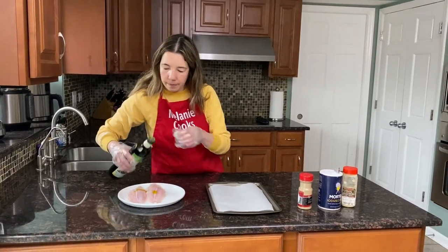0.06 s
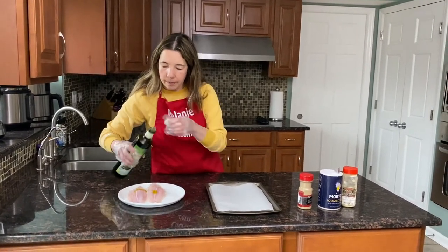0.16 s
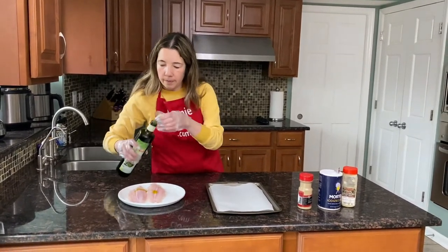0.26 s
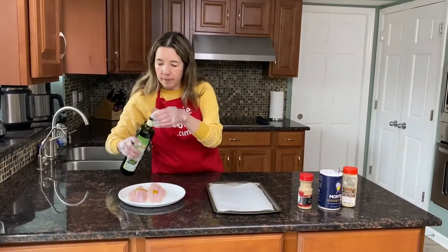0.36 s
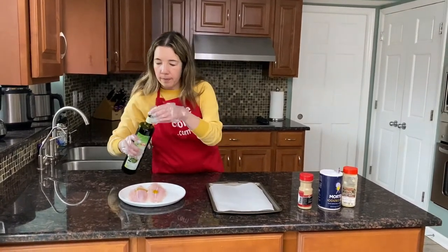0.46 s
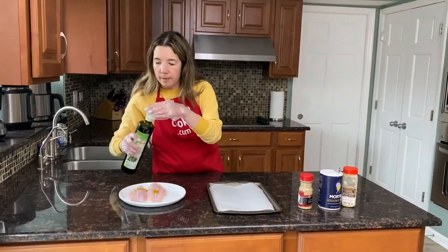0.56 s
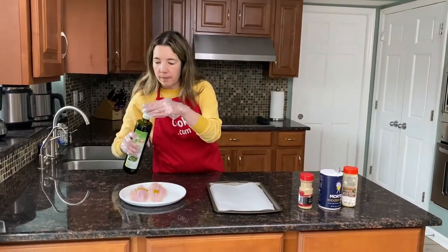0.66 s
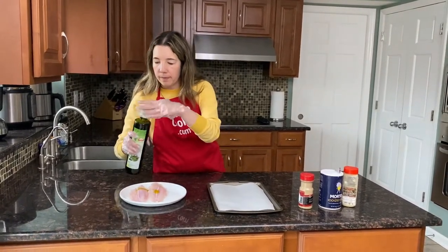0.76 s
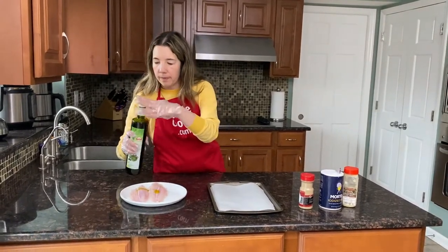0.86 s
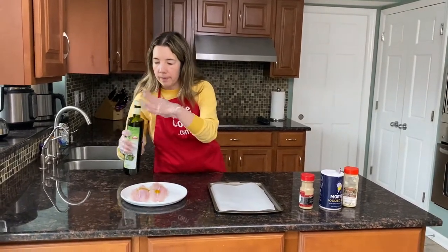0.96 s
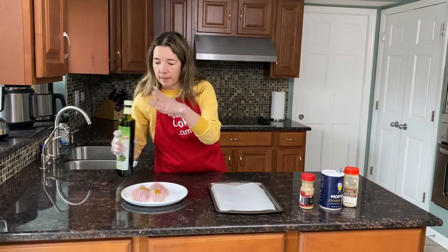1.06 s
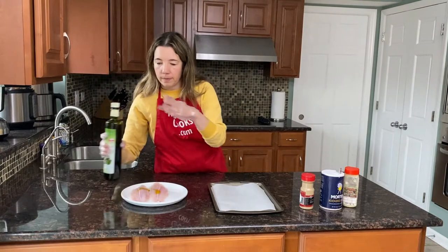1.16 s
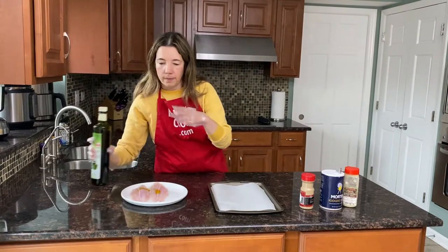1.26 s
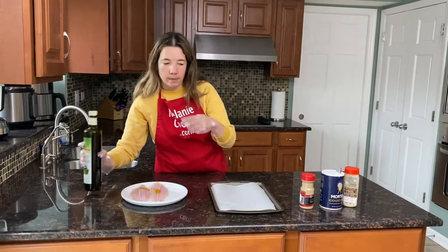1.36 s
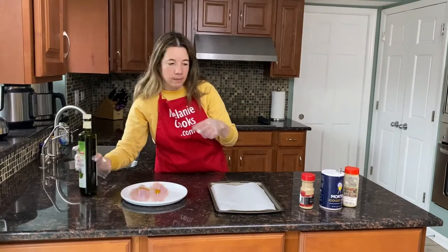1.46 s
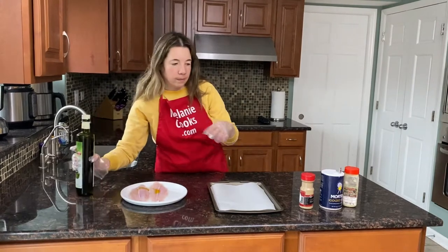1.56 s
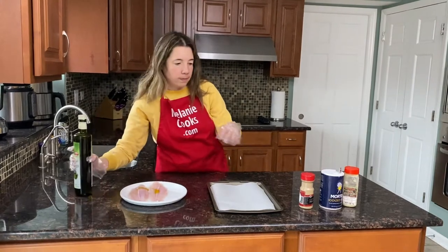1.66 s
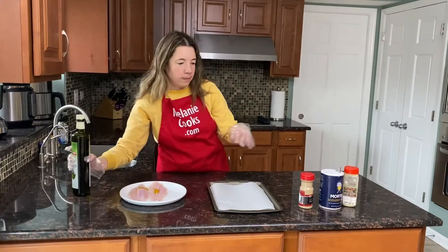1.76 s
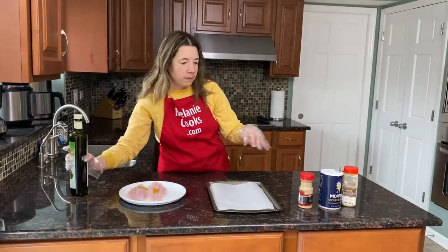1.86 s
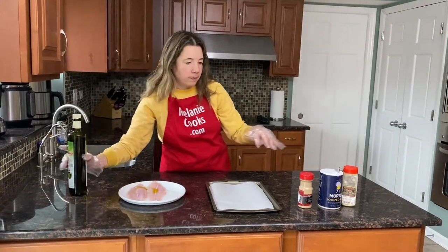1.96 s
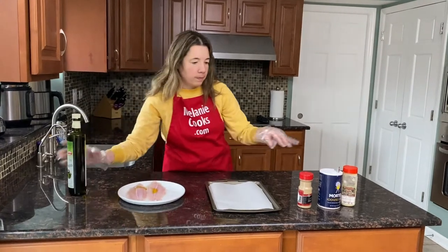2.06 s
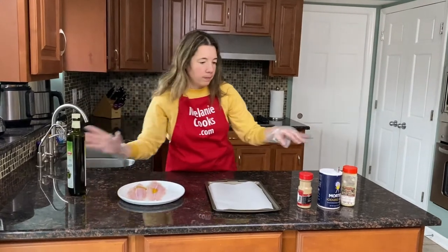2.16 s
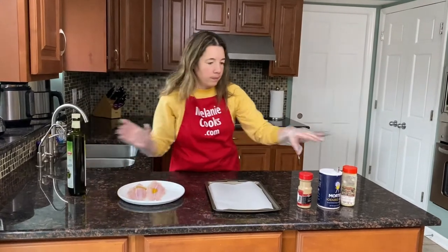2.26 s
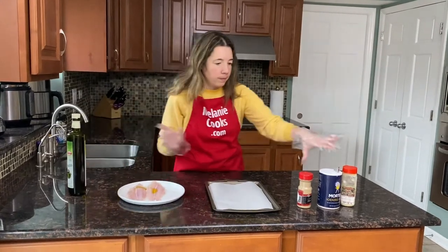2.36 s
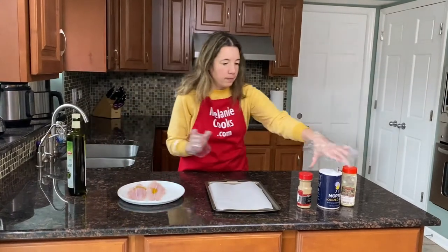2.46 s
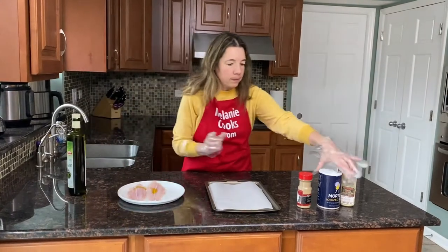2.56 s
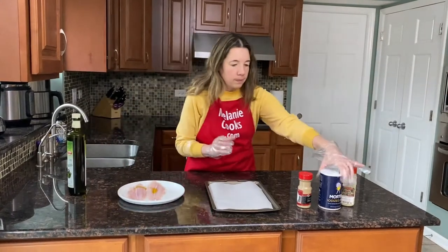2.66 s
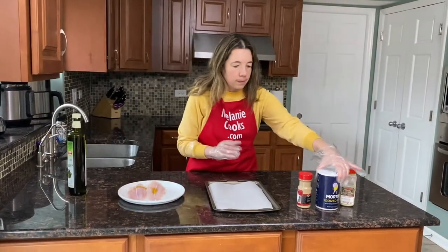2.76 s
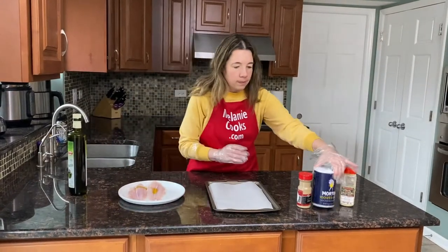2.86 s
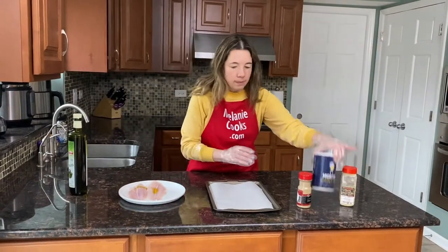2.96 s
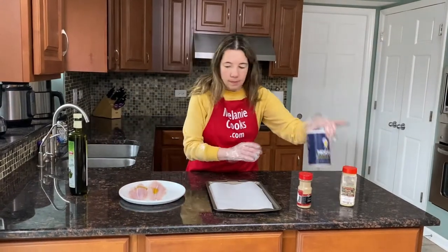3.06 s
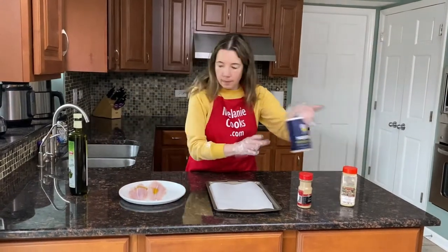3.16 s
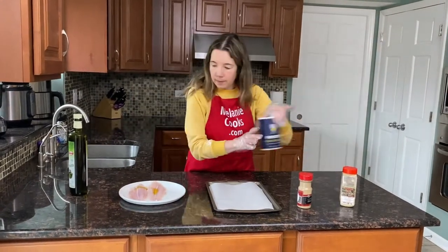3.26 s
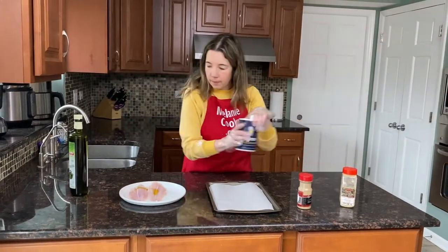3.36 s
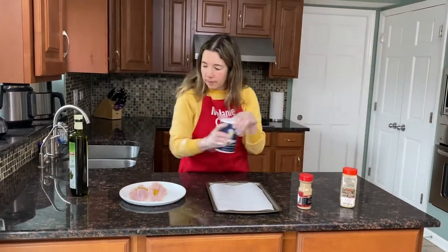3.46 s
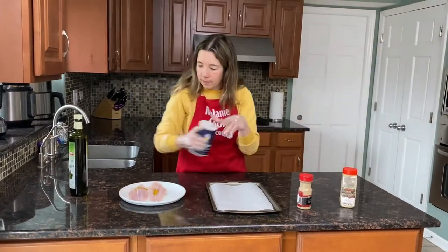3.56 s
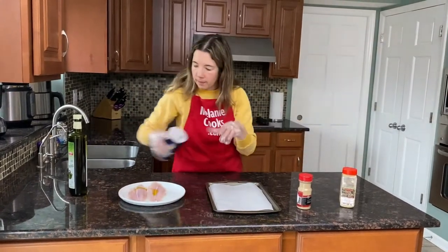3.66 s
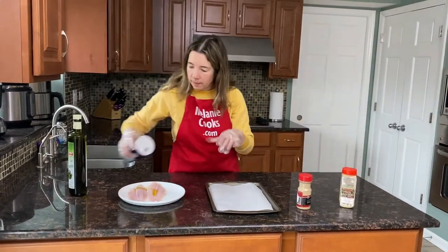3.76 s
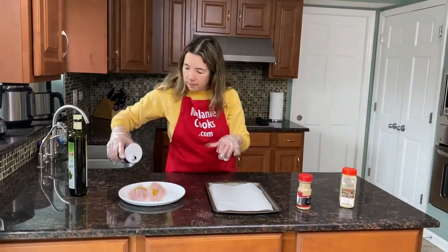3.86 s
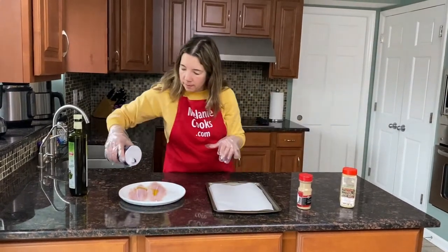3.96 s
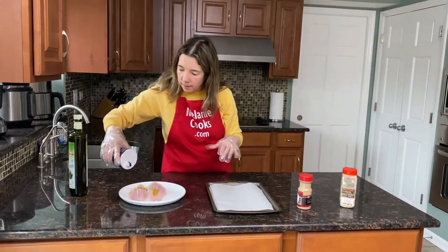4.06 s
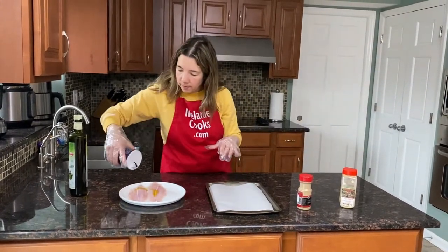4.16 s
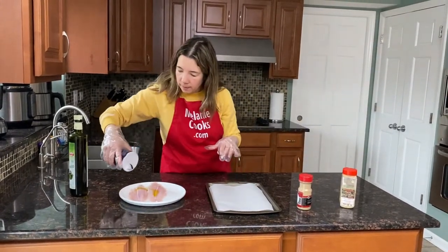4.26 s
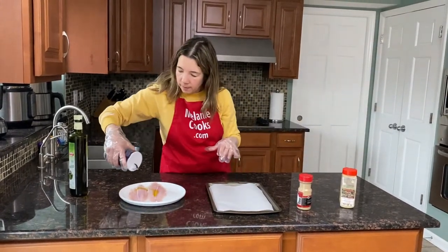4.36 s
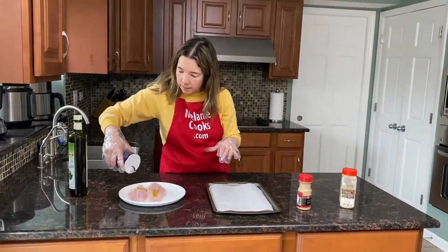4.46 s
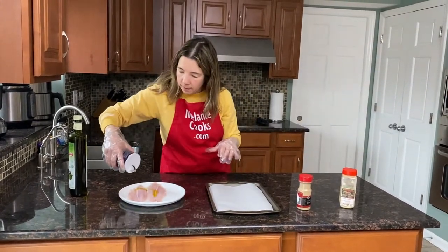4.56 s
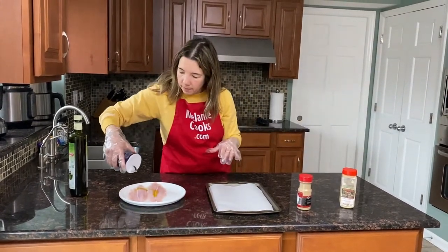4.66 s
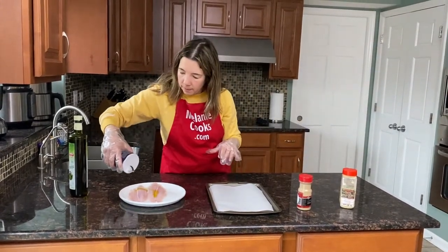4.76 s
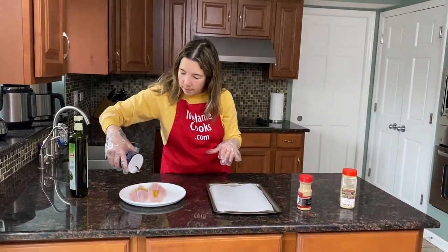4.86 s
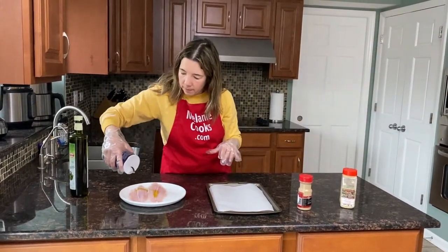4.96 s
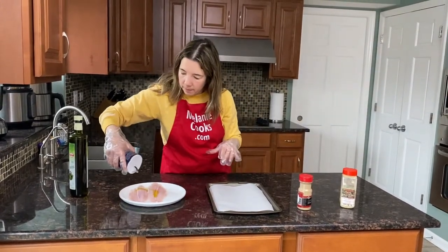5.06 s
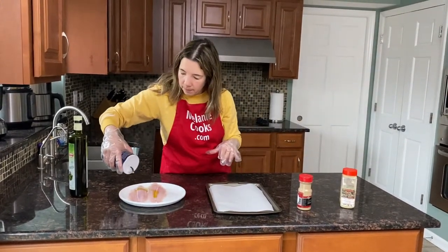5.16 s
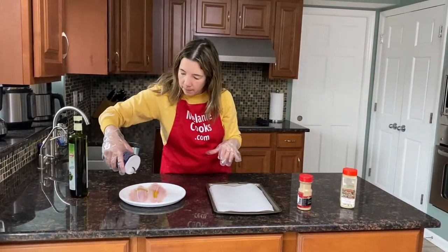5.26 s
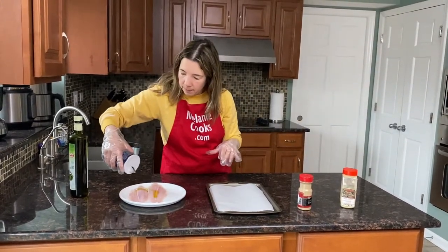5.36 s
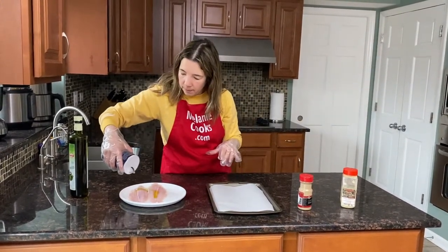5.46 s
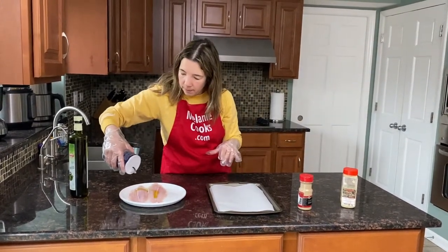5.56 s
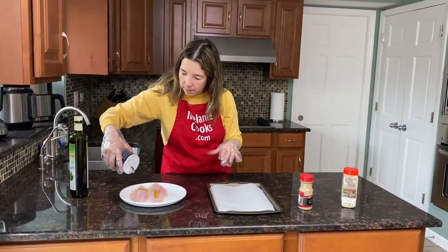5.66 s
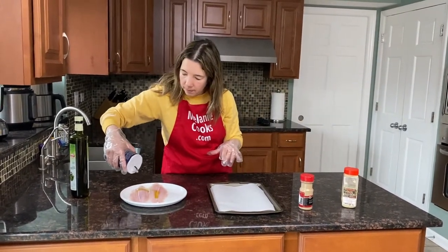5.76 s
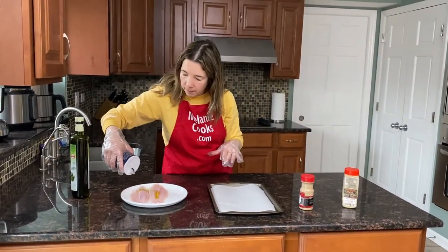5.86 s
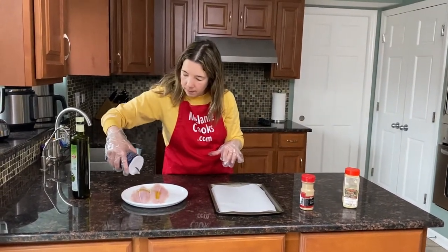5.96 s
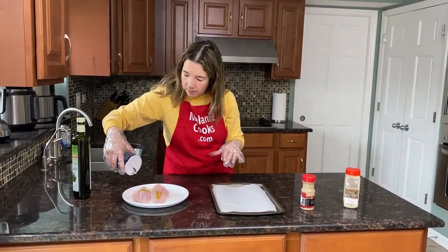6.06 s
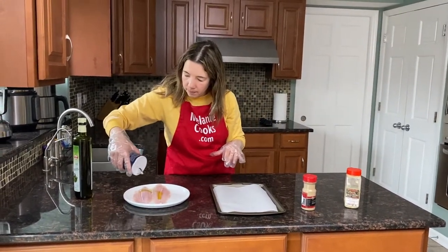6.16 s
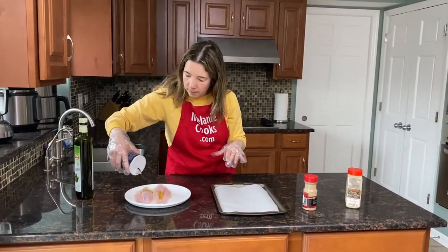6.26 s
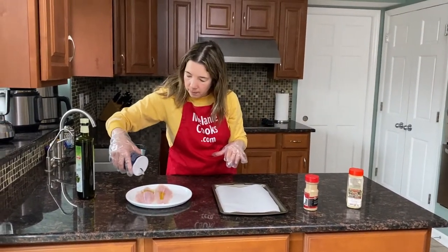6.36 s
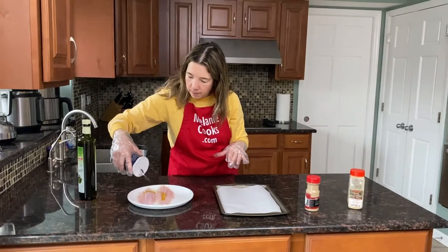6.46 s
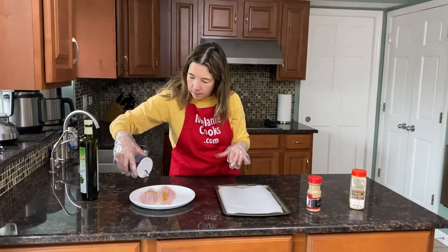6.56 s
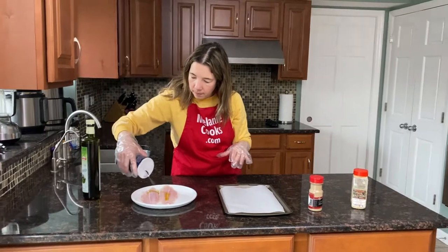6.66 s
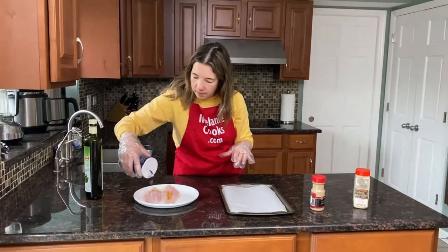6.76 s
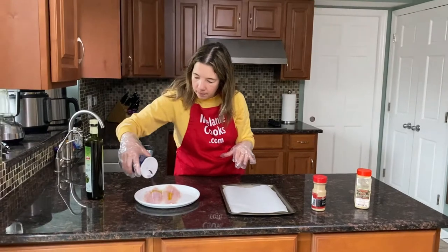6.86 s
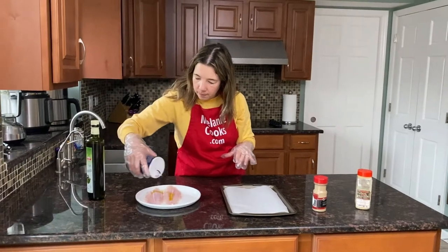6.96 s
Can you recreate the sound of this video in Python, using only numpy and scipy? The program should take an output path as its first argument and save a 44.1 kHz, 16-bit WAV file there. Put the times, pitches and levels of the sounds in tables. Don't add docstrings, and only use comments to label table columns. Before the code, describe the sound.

A quiet kitchen with hard walls: low fridge hum, soft room air and a faint fan whine that swells now and then, most clearly near 1.3 seconds. From 0 to 1.4 seconds, sleeves rustle softly with small dry crackles and a light tick near 0.6. At 1.5 a full glass bottle lands on a stone counter, by far the loudest event: a hard touch, heavy low clunk, short glassy ring and late hollow cabinet boom. Between 1.7 and 1.85 its foot rocks in quiet, dull ringing taps. From 2 to 4 seconds brisk bright rustles come and go, with soft hollow carton knocks near 2.75 and a sharp crackle and knock at 3.35. From 4.1 to 7, salt hisses in gentle, quick, uneven shakes, roughly nine per second, dipping around 5.7 and growing crisper. A small stereo microphone captures it with brief reverberation.

```python
import sys
import numpy as np
from scipy import signal
from scipy.fft import rfft, irfft, next_fast_len
from scipy.io import wavfile
from scipy.ndimage import uniform_filter1d, map_coordinates

SR = 44100
rng = np.random.default_rng(int(sys.argv[2]) if len(sys.argv) > 2 else 0)


def store_wav(level_fs):
    pcm = np.round(np.clip(np.atleast_2d(level_fs), -1, 1) * 32767)
    wavfile.write(sys.argv[1], SR, pcm.T.astype(np.int16))


def attenuation_scalar(level_db):
    decades = np.asarray(level_db, float) / 20
    return 10 ** decades


N = 309863

# start in seconds, blow level in dB, hardness in Hz, ring of the bottle in dB.
LANDING = [
    (1.507, -9.5, 4000, -16),
    (1.5118, -6, 933, 2.5),
    (1.532, -22.5, 896, 12.5),
]
# start in seconds, blow level in dB, hardness in Hz, ring of the bottle in dB.
ROCKING = [
    (1.706, -28.5, 500, 11.5),
    (1.729, -31, 450, 13.5),
    (1.7422, -33.5, 450, 12.5),
    (1.777, -27, 1500, 8),
    (1.8001, -32.5, 695, 8),
    (1.8133, -30, 608, 14),
    (1.838, -32, 700, 8),
]
# pitch in Hz, level in dB, time to fall 60 dB in seconds.
SLAB = [(72, -40, .5), (138, -22.5, 0.5), (225.1, -11.5, 0.44), (266, -5.5, 0.31), (297.2, 1.5, 0.12),
        (366, -22, 0.23), (462, -17, 0.35), (529, -5, 0.1), (602, -12.5, 0.51), (684, -16, 0.32),
        (950, -9, 0.13), (1366, -8, 0.2), (1640, -28, 0.16), (1660, -19, 0.14), (1890, -12, 0.064),
        (2080, -37, .2), (2610, -37, .15)]
# pitch in Hz, level in dB, time to fall 60 dB in seconds.
STANDING = [(187.5, -21, 0.35), (271.2, -8, 0.29), (305.7, 4.5, 0.12), (458, -7.5, 0.45),
            (514.5, -7.5, 0.34), (687.66, -34, 0.64), (936, -9.5, 0.15), (1410, -34, 0.16),
            (1655, -17.5, 0.33), (1886.7, -10.5, 0.16)]
# pitch in Hz, level in dB, time to fall 60 dB in seconds.
GLASS = [(2300, -54, 0.16), (2860, -45, 0.13), (3180, -44, 0.26), (4300, -40.5, 0.071), (5190, -36, 0.018),
         (6630, -53, .2), (7329, -51.5, 0.18), (8270, -41.5, 0.13)]
# frequency in Hz, level in dB per Hz.
THUD = [(24, -39), (40, -31), (304, -8.5), (343, -10), (622, -12), (3230, -36.5), (3820, -43), (7630, -42),
        (9230, -65), (9910, -52), (12000, -39), (15600, -81), (22000, -120)]
# time of full strength in seconds, level in dB,
# rise in dB per second, hold in seconds, level of the dull body relative to the hiss in dB.
GESTURES = [(0.0, -54.5, 200, 0.11, -7.5), (0.156, -55, 330, .025, -10), (0.304, -57.5, 450, .005, -17),
            (0.417, -61.5, 650, 0.083, -7.5), (0.578, -49.5, 153, 0.087, -5.5),
            (0.736, -49.5, 69, 0.14, -7.5), (0.902, -50, 83, 0.072, -6), (1.036, -56.5, 100, .04, -8.5),
            (1.13, -55.5, 280, 0.11, -9), (1.314, -54, 330, 0.11, -9), (1.55, -52, 143.5, .01, -1),
            (1.706, -61, 101.5, 0.13, 1.5), (2.067, -44.5, 77, .005, -7.5), (2.193, -58, 100, 0.071, -9),
            (2.343, -44.5, 166, 0.16, -8.5), (2.588, -45.5, 280, 0.077, -11),
            (2.745, -42, 108, 0.017, -7.5), (2.856, -47, 100, 0.039, -7.5), (2.98, -59, 100, .06, -9),
            (3.155, -48, 76, 0.14, -8.5), (3.338, -42, 500, 0.31, -7), (3.736, -50.5, 200, .01, -11),
            (3.81, -55.5, 200, .1, -6.5), (4.016, -56.5, 150, 0.077, -4.5)]
SAG_DB_PER_S, RELEASE_DB_PER_S = 17, 123
STILL_DB, STILL_UNTIL_S = -74, 4.6
# frequency in Hz, level in dB per Hz.
HISS = [(1500, -40), (3500, -8), (5000, -4.5), (7000, -1.5), (9000, -1.5), (12000, 0), (14000, -0.5),
        (15800, -14)]
# frequency in Hz, level in dB per Hz.
BODY = [(150, -3), (500, -5), (1200, -2), (2500, -2), (4000, -4), (7000, -12)]
# time of the peak in seconds, level in dB.
TOSSES = [(4.132, -51.5), (4.21, -54), (4.285, -54.5), (4.37, -51.5), (4.478, -52), (4.574, -58.5),
          (4.683, -61.5), (4.824, -56), (4.912, -52.5), (5.038, -53), (5.124, -54), (5.249, -54),
          (5.368, -57), (5.493, -59), (5.563, -55), (5.684, -68), (5.808, -68.5), (5.903, -60.5),
          (6.012, -51), (6.138, -52.5), (6.242, -49.5), (6.349, -56), (6.448, -60), (6.551, -56.5),
          (6.628, -62.5), (6.74, -61.5), (6.82, -56), (6.908, -53), (7.014, -60.5)]
SWELL_S, FALL_S = 0.034, 0.05
SHORTENS_PER_S = 0.1792
# frequency in Hz, level in dB per Hz.
CRYSTALS = [(1200, -21), (2500, -6.5), (4500, -8), (7000, -2.5), (9000, -1.5), (11500, -2), (14000, -1.5),
            (15800, -20)]
# start in seconds, peak level in dB.
CRACKLES = [(0.2937, -52), (0.3167, -48), (0.417, -35.5), (0.5664, -35), (0.7414, -43), (1.2974, -52.5),
            (1.3285, -44.5), (1.4334, -33), (2.2585, -35), (2.2987, -58), (3.032, -39), (3.1004, -46),
            (3.336, -23), (3.72, -30), (3.7389, -50), (3.847, -36), (3.8831, -45), (3.9943, -39),
            (4.0074, -33), (5.5368, -49), (5.9795, -40), (6.194, -37)]
# start in seconds, level in dB, pitch in Hz, time to fall 60 dB in seconds.
KNOCKS = [(0.566, -43, 1410, 0.036), (.568, -46, 2300, .05), (.568, -47, 4360, 0.071),
          (.622, -45.5, 1437, 0.0659), (.638, -47, 1640, .06), (2.73, -44.5, 195, 0.22),
          (2.77, -51, 205.8, 0.14), (2.75, -53.5, 2150, 0.23), (3.331, -52, 207, 0.13),
          (3.345, -46, 2500, .08), (4.022, -58, 251, 0.12)]
# frequency in Hz, level in dB per Hz.
AIR = [(15, -46), (25, -10.5), (55, -2), (91, -10.5), (110, -8.5), (248, -9), (307, -5), (392, -11.5),
       (691, -10), (2890, -29), (8730, -29), (11400, -27.5), (15800, -39)]
# pitch in Hz, width in Hz, level in dB.
HUM = [
    (48.2, 16, -68),
    (79, 8.3, -72.5),
    (120.6, 16, -70.5),
    (303, 30, -84.5),
    (674, 15, -77.5),
]
# time of the peak in seconds, level in dB, width in seconds.
WHINES = [
    (1.32, -66, 0.318),
    (3.1, -71, 0.83),
    (3.9, -69, 0.38),
    (4.9, -75, 0.11),
    (6.1, -70, .5),
]
WHINE_REST_DB = -79
# frequency in Hz, likeness from -1 to 1.
ALIKE = [(30, .98), (130, 0.72), (290, 0.83), (640, 0.058), (1400, 0.1464), (3300, 0.64), (5200, 0.37),
         (6800, 0.72)]
# frequency in Hz, time to fall 60 dB in seconds.
WALLS = [(60, 0.67), (300, 0.43), (1500, 0.58), (5000, 0.3), (12000, 0.16)]


def bottle():
    time = np.arange(N) / SR
    t = np.clip(time - 1.52, 0, None)
    swell = t / 0.039 * np.exp(1 - t / 0.032)
    boom = swell * (attenuation_scalar(-36.5) * np.sin(2 * np.pi * 62 * t) + attenuation_scalar(-30) * np.sin(2 * np.pi * 136 * t))
    t = np.clip(time - LANDING[0][0], 0, None)
    clink = np.zeros(N)
    for hz, db, t60 in GLASS:
        clink += attenuation_scalar(db + 2.5 * wobble(150) - 60 * t / t60) * np.sin(2 * np.pi * hz * t)
    landing = strikes(LANDING, SLAB, thud_db=17.0)
    rocking = strikes(ROCKING, STANDING, thud_db=20.0)
    return landing + rocking + boom + clink


def strikes(contacts, modes, thud_db):
    out = np.zeros((2, N + SR))
    t = np.arange(SR // 2) / SR
    for s, db, hard_hz, ring_db in contacts:
        ring = np.zeros(len(t))
        for hz, level, t60 in modes:
            fading = attenuation_scalar(level + rng.normal(0, 1.6) - 60 * t / t60)
            ring += fading / (1 + (hz / hard_hz) ** 2) * np.sin(2 * np.pi * hz * t)
        ring *= attenuation_scalar(ring_db - 6.5) * (1 - np.exp(-t / 0.0013))
        thud = thud_pulse(hard_hz)
        echo = signal.fftconvolve(thud[None], tail(), axes=1)[:, :len(t)]
        far = signal.fftconvolve(ring[None], tail(), axes=1)[:, :len(t)]
        start = round(s * SR)
        out[:, start:start + len(t)] += attenuation_scalar(db) * (ring + attenuation_scalar(-11.5) * far + attenuation_scalar(thud_db) * echo)
    return out[:, :N]


def thud_pulse(hard_hz):
    hz = np.fft.rfftfreq(2048, 1 / SR)
    colour = attenuation_scalar(along(THUD, hz)) / (1 + (hz / hard_hz) ** 2) ** 0.5
    cepstrum = irfft(np.log(colour + 1e-6))
    fold = np.r_[1, 2 * np.ones(1023), 1, np.zeros(1023)]
    thud = irfft(np.exp(rfft(cepstrum * fold)))
    return thud / np.linalg.norm(thud)


def rustle():
    t = np.arange(0, N / SR, 0.001)
    s, db, rise_db_per_s, hold_s, body_db = np.transpose(GESTURES)[:, :, None]
    after = np.clip(t - s, 0, None)
    held = np.minimum(after, hold_s)
    rise_db = rise_db_per_s * np.clip(s - t, 0, None)
    level_db = db - rise_db - SAG_DB_PER_S * held - RELEASE_DB_PER_S * (after - held)
    still = attenuation_scalar(2 * (STILL_DB - RELEASE_DB_PER_S * np.clip(t - STILL_UNTIL_S, 0, None)))

    def strength(movement_db):
        power = still + attenuation_scalar(2 * movement_db).sum(axis=0)
        return np.interp(np.arange(N) / SR, t, np.sqrt(power))

    flutter = attenuation_scalar(1.04 * wobble(29.9))
    fine = attenuation_scalar(3) * strength(level_db) * grit(HISS, spiky_db=2.5, patchy_db=1.5)
    dull = attenuation_scalar(5) * strength(level_db + body_db) * grit(BODY, spiky_db=2.0, patchy_db=1.0)
    return flutter * (fine + dull)


def salt():
    t = np.arange(0, N / SR, 0.001)
    s, db = np.transpose(TOSSES)[:, :, None]
    crisper = np.exp(SHORTENS_PER_S * (s - s[0]))
    u = (t - s) / np.where(t < s, SWELL_S, FALL_S) * crisper
    power = (attenuation_scalar(2 * db) * np.exp(-u ** 2)).sum(axis=0)
    swells = np.interp(np.arange(N) / SR, t, np.sqrt(power))
    return swells * attenuation_scalar(-2.0 + wobble(48)) * grit(CRYSTALS, spiky_db=3.0, patchy_db=1.0)


def crackles():
    t = np.arange(SR // 20) / SR
    shape = np.zeros(N + SR)
    fall = attenuation_scalar(-60 * t / 0.022)
    for s, db in CRACKLES:
        start = round(s * SR)
        shape[start:start + len(t)] += attenuation_scalar(db - 9.5) * fall
    return shape[:N] * spread(rng.standard_normal((2, N)), HISS)


def knocks():
    out = np.zeros((2, N + SR))
    t = np.arange(SR // 3) / SR
    for s, db, hz, t60 in KNOCKS:
        ring = attenuation_scalar(db - 60 * t / t60) * (1 - np.exp(-t / 0.0018)) * np.sin(2 * np.pi * hz * t)
        wet = signal.fftconvolve(ring[None], tail(), axes=1)[:, :len(t)]
        start = round(s * SR)
        out[:, start:start + len(t)] += 0.63 * wet + ring
    return out[:, :N]


def kitchen():
    air = attenuation_scalar(-57.5 + 2.1 * wobble(2.688)) * spread(rng.standard_normal((2, N)), AIR)
    t = np.arange(N) / SR
    whine = attenuation_scalar(2 * WHINE_REST_DB) * np.ones(N)
    for s, db, width_s in WHINES:
        whine += attenuation_scalar(2 * db) * np.exp(-((t - s) / width_s) ** 2)
    whine_db = 10 * np.log10(whine)
    for hz, width, db in HUM + [(871, 20, whine_db)]:
        noise = rng.standard_normal((2, N))
        line = filtered(noise, lambda f: 1 / (1 + ((f - hz) / width * 2) ** 2))
        stereo = unit(line[0] + 0.2951 * line[1] * [[1], [-1]])
        air += attenuation_scalar(db + 2.9 * wobble(1.695)) * stereo
    return air


def tail():
    hz, t, z = signal.stft(rng.standard_normal((2, SR // 2)), SR, nperseg=256)
    fading = attenuation_scalar(-60 * t / along(WALLS, hz)[:, None])
    mid, side = signal.istft(z * fading, SR, nperseg=256)[1]
    side = signal.lfilter(*signal.butter(1, 700, "high", fs=SR), side)
    return np.array([mid + side, mid - side]) / np.linalg.norm(mid)


def grit(spectrum, spiky_db, patchy_db):
    size_db = spiky_db * np.minimum(rng.exponential(size=N), 4.5)
    ticks = rng.standard_normal((2, N)) * attenuation_scalar(size_db)
    z = signal.stft(ticks, nperseg=256)[2]
    field = uniform_filter1d(rng.standard_normal(z.shape[1:]), 12, 0)
    field = uniform_filter1d(field, 4, 1)
    patchy = signal.istft(z * attenuation_scalar(patchy_db * unit(field)), nperseg=256)[1]
    return spread(patchy[:, :N], spectrum)


def spread(pair, spectrum):
    def response(hz):
        angle = np.arccos(np.clip(along(ALIKE, hz), -1, 1)) / 2
        angle = angle * np.clip(1 - (hz - 7000) / 1000, 0, 1)
        return attenuation_scalar(along(spectrum, hz)) * [np.cos(angle), np.sin(angle)]

    mid, side = filtered(pair, response)
    return unit(np.array([mid + side, mid - side]))


def filtered(x, response):
    m = next_fast_len(N + SR // 2)
    return irfft(rfft(x, m) * response(np.fft.rfftfreq(m, 1 / SR)), m)[..., :N]


def wobble(rate):
    knots = rng.standard_normal(int(N * rate / SR) + 4)
    return map_coordinates(knots, [np.arange(N) * rate / SR])


def along(points, hz):
    f, v = np.transpose(points)
    return np.interp(np.log(hz + 1), np.log(f + 1), v)


def unit(x):
    return x / np.sqrt(np.mean(x ** 2) + 1e-20)


def scene():
    return bottle() + rustle() + salt() + crackles() + knocks() + kitchen()


def low_pass(x):
    return signal.sosfilt(signal.butter(12, 16450, fs=SR, output="sos"), x)


def record(dry):
    def response(hz):
        turn = 2 * np.pi * np.clip(hz - 6850, 0, None) / 4300
        lag = turn - 0.077 * np.sin(2 * turn)
        band = (hz < 15750) / (1 + (38 / (hz + 1)) ** 6)
        return np.exp(0.5j * lag * np.array([[-1], [1]])) * band

    x = filtered(dry, response)
    mix = x / (1 + np.abs(x / 0.53) ** 4) ** 0.27
    return low_pass(mix)


dry = scene()
out = record(dry)
store_wav(out)
```